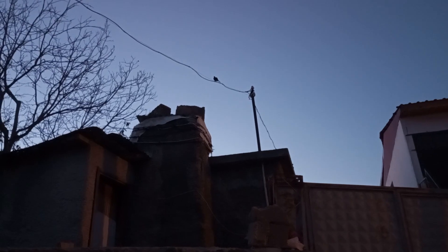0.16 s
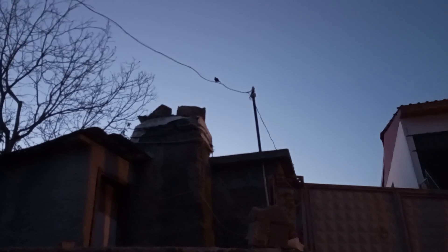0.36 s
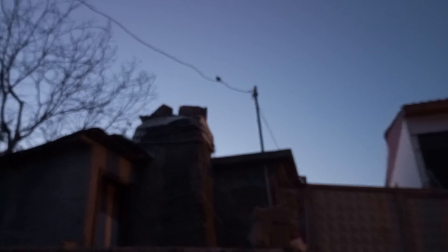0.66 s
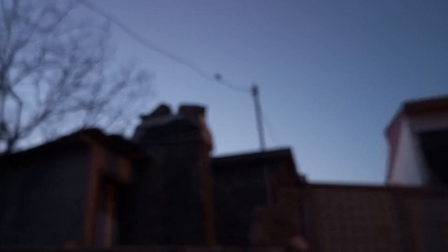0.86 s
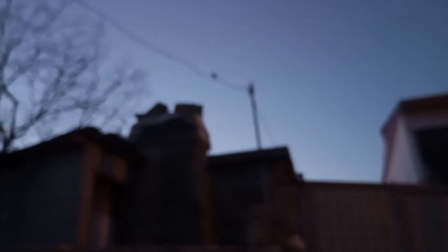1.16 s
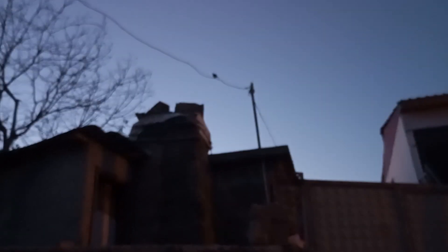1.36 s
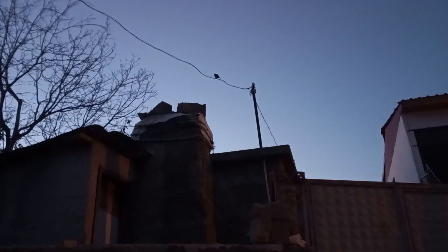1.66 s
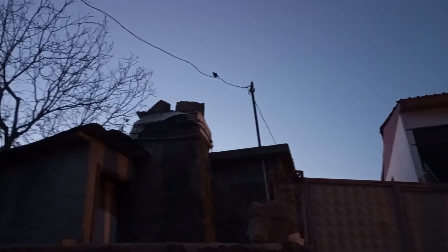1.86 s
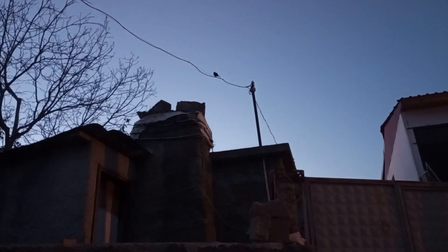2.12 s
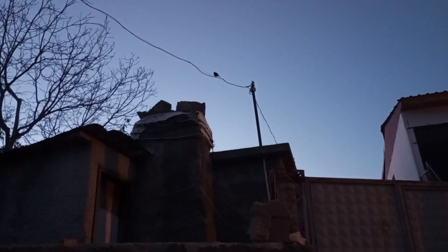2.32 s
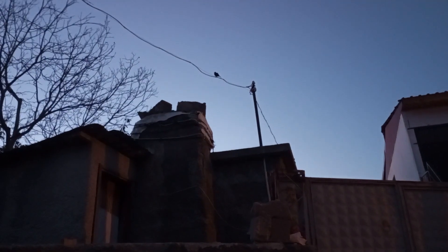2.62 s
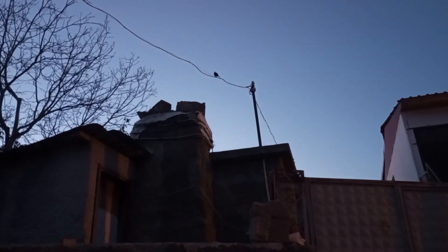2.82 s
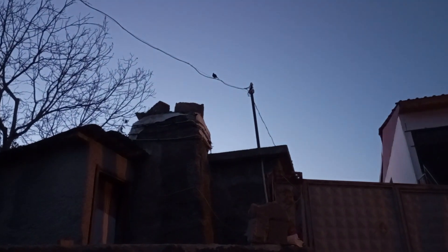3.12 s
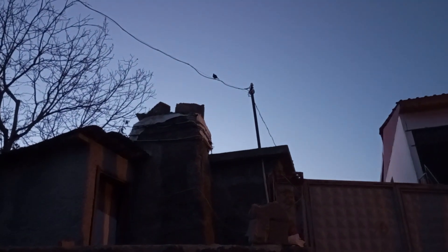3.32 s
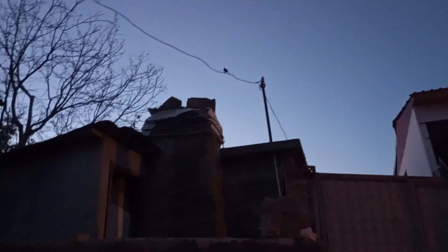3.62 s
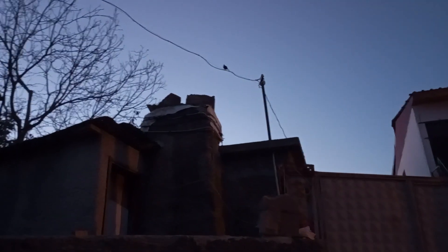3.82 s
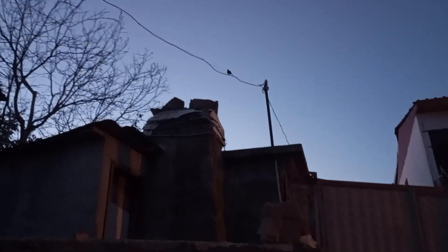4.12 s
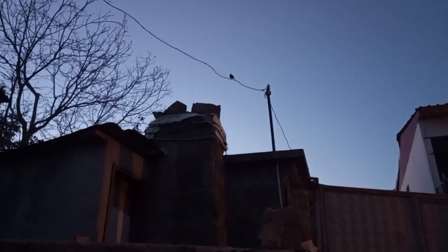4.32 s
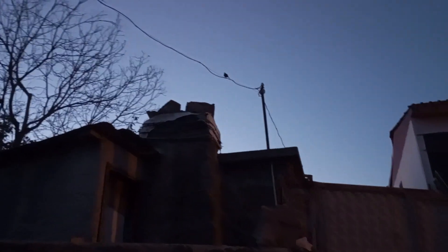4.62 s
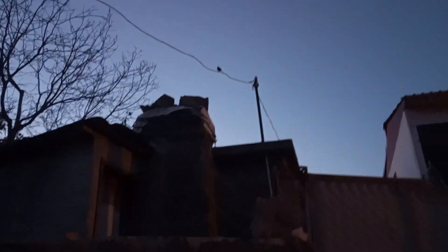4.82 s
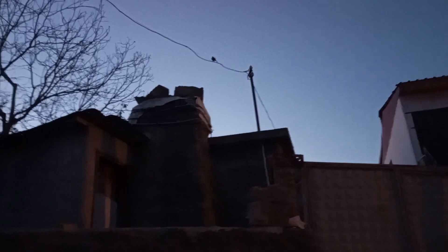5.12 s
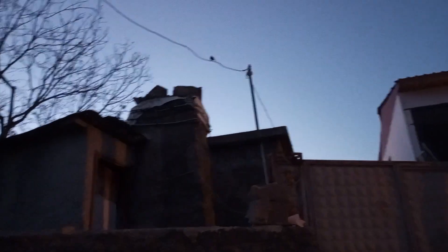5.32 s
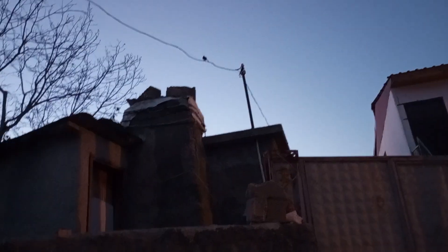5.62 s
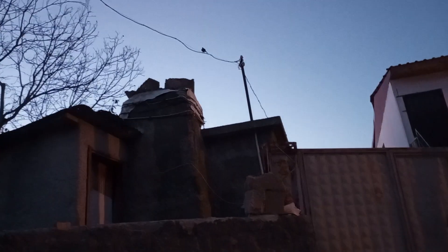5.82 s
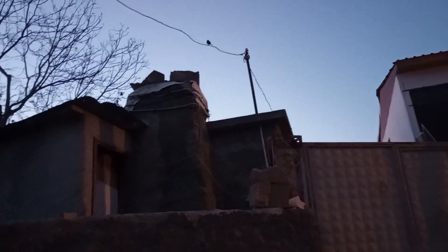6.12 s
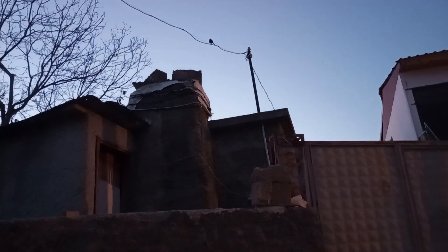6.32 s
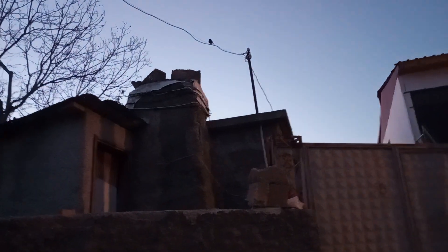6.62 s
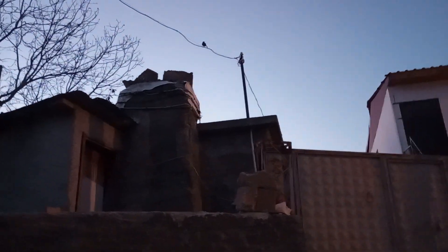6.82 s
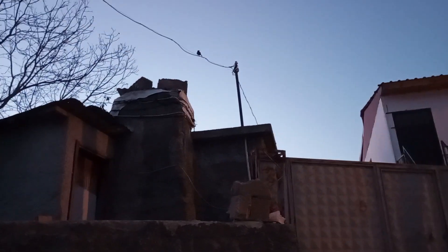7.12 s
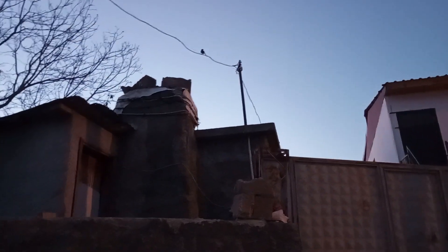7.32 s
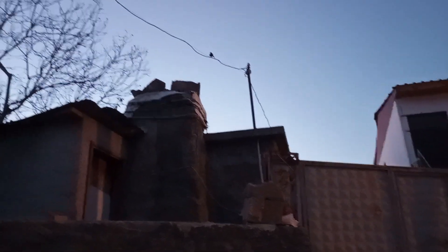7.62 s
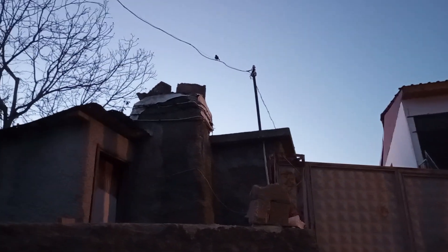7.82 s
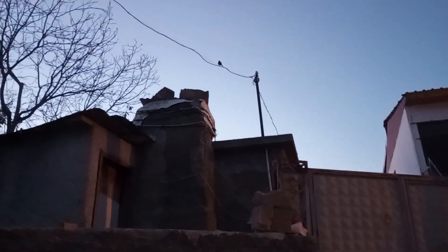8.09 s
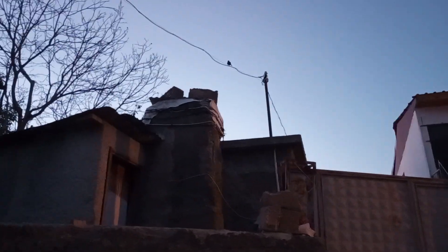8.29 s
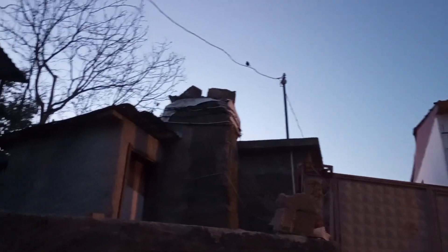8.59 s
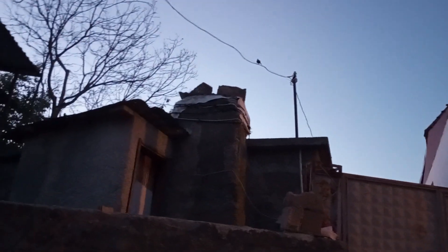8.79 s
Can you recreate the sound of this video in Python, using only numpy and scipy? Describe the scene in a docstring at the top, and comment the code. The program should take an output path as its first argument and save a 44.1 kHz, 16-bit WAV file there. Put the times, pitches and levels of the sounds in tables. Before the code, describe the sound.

Distant roosters crow, then a nearby blackbird whistles, squeaks and trills over a faint town hum and soft wind.

```python
"""Among the roofs of a town, a blackbird on a wire sings fluted whistles, buzzes, squeaks and a trill.
Its voice box, the syrinx, makes a nearly pure tone that slides and swings in pitch.
Two distant roosters crow, their throats shaping a rough voice, and the house walls echo.
Light wind rumbles on the microphone over the hum of the town, and a hand-held camera ticks faintly."""
import sys
import numpy as np
from scipy import signal
from scipy.fft import rfft, irfft, next_fast_len
from scipy.io import wavfile
from scipy.ndimage import uniform_filter1d, map_coordinates

SR = 44100
rng = np.random.default_rng(int(sys.argv[2]) if len(sys.argv) > 2 else 0)


def to_wav(s):
    """Save 16-bit WAV."""
    ch = np.atleast_2d(s).T  # columns
    pcm = np.round(np.clip(ch, -1, 1) * 32767)  # PCM
    wavfile.write(sys.argv[1], SR, pcm.astype(np.int16))


N = 394739
TIME = np.arange(N) / SR


def amp(db):
    """Turn decibels into a gain to multiply by."""
    return 10 ** (np.asarray(db) / 20)


def unit(x):
    """Scale a sound to an average strength (rms) of 1."""
    return x / np.sqrt(np.mean(x ** 2) + 1e-20)


def along(points, hz):
    """Read between (frequency_hz, value) points on a log frequency scale."""
    freqs, values = np.transpose(points)
    return np.interp(np.log(np.abs(hz) + 1), np.log(freqs + 1), values)


def curves(rows):
    """The samples that timed rows cover, then each column as a curve over them."""
    times, *columns = np.transpose(rows)
    span = np.flatnonzero((TIME >= times[0]) & (TIME <= times[-1]))
    return [span] + [np.interp(TIME[span], times, column) for column in columns]


def stretch(start, length):
    """The samples of an event and its progress from 0 to 1."""
    span = np.flatnonzero((TIME >= start) & (TIME < start + length))
    return span, (TIME[span] - start) / length


def ease(ramp):
    """A smooth rise from 0 to 1."""
    return np.sin(np.pi / 2 * np.clip(ramp, 0, 1)) ** 2


def envelope(progress, length, attack, release):
    """Fade in, hold and fade out; times are in seconds."""
    return ease(np.minimum(progress * length / attack, (1 - progress) * length / release))


def fade(size, edge_s=0.0042):
    """Soften both ends of a sound."""
    t = np.arange(size) / SR
    return ease(np.minimum(t, t[::-1]) / edge_s)


def wobble(rate, size=N):
    """A smooth curve through `rate` random values a second."""
    knots = rng.standard_normal(int(size * rate / SR) + 4)
    return map_coordinates(knots, [np.arange(size) * rate / SR])


def filtered(x, response):
    """Scale each frequency of a sound by response(hz)."""
    size = next_fast_len(N + SR // 2)
    return irfft(rfft(x, size) * response(np.fft.rfftfreq(size, 1 / SR)), size)[:N]


def noise(spectrum):
    """Noise of strength 1 with the given tone colour."""
    return unit(filtered(rng.standard_normal(N), lambda hz: amp(along(spectrum, hz))))


def phase_of(hz):
    """How far a wave of changing pitch has turned, in radians."""
    return 2 * np.pi * np.cumsum(hz) / SR


# How the town's far rush grows: time_s, level_db
RUSH_LEVELS = [(0.0, -61.5), (0.6, -60), (1.35, -58.5), (5.76, -58.5), (8.15, -55.5), (8.95, -49.5)]
# Tone colours of the rush, the still air and the hiss: frequency_hz, gain_db
RUSH_COLOUR = [(210, -23), (350, -8.5), (382, -14), (420, -9), (630, 1.5), (680, 1.5), (1320, -2),
               (1470, -3), (1590, -2.5), (3500, -39.5), (4550, -59.5), (7700, -120)]
AIR_COLOUR = [(24, -22), (40, -12.5), (70, -8), (186, -1.5), (244, 2), (292, -2.5), (733, -8), (847, -3.5),
              (961, -3), (1330, -4), (3000, -18.5), (3900, -52), (6600, -120)]
HISS_COLOUR = [(1760, -45), (3000, 3), (3900, -1), (4530, -0.5), (5850, 2.5), (7750, -9.5), (9590, -2),
               (10300, -2.5), (11900, -12.5), (15500, -18.5)]

def town():
    """A far rush slowly swells, over still air and a thin hiss."""
    swell = amp(np.interp(TIME, *np.transpose(RUSH_LEVELS)))
    rush = amp(2.5 + 0.56 * wobble(2.57)) * swell * noise(RUSH_COLOUR)
    return rush + amp(-57.5) * noise(AIR_COLOUR) + amp(-71.5) * noise(HISS_COLOUR)


# Clicks of the camera body: start_s, level_db
CAMERA_TICKS = [(1.2953, -54), (1.7055, -56), (2.0173, -53), (2.57, -64.5), (4.3497, -54), (5.6595, -60)]

def camera_ticks(decay_s=0.012):
    """The camera body gives tiny dry clicks: bright noise that dies at once."""
    strength = sum(amp(db - 60 * np.abs(TIME - s) / decay_s) * (TIME >= s) for s, db in CAMERA_TICKS)
    return amp(-3.5) * strength * noise([(1000, -17), (5000, -4), (10000, 0.5), (15000, -4.5)])


# Tone colour of the wind's rumble: frequency_hz, gain_db
RUMBLE_COLOUR = [(13, -63), (22, -26.5), (64, 4.5), (114, 3.5), (166, -5.5), (276, -21.5), (420, -40),
                 (550, -64.5), (920, -120)]
# Gusts on the microphone: start_s, length_s, level_db
WIND_GUSTS = [(0.0, 0.95, -43.5), (0.994, 0.2, -45), (1.107, 1.8, -56), (2.06, 0.41, -51.5),
              (6.576, 2.5, -44.5), (6.91, 1.73, -37.5)]
# The strongest swirls of air: start_s, level_db
WIND_THUMPS = [(0.105, -26.5), (0.27, -38), (0.399, -34.5), (0.727, -31.5), (0.78, -35), (1.051, -44),
               (7.973, -23.5), (8.118, -24), (8.145, -22.5), (8.432, -26.5), (8.516, -26.5)]

def wind(calm_db=-61.5, lump_db=4.0, thump_hz=100, low_cut_hz=42):
    """Swirling air rumbles on the microphone in gusts; the strongest swirls land as soft thumps."""
    gusts = [amp(db) * envelope((TIME - start) / length, length, attack=0.066, release=0.16)
             for start, length, db in WIND_GUSTS]
    strength = np.maximum(amp(calm_db), np.max(gusts, axis=0))
    out = amp(-2) * strength * unit(noise(RUMBLE_COLOUR) * amp(lump_db * wobble(24)))
    t = np.arange(SR // 10) / SR
    age = t / 0.0041
    pulse = age * np.exp(1 - age)
    for start, db in WIND_THUMPS:
        hz = thump_hz * np.exp(0.23 * rng.standard_normal())
        out[round(start * SR):][:len(t)] += amp(db - 1.5) * pulse * np.sin(2 * np.pi * hz * t)
    # the small microphone loses the deepest bass
    return filtered(out, lambda hz: hz ** 2 / np.hypot(hz ** 2, low_cut_hz ** 2))


# Time for the street's sound to fade by 60 dB: frequency_hz, decay_s
STREET_DECAY = [(300, 0.31), (2000, 0.56), (5000, 0.45), (12000, 0.043)]

def street_reverb(x, build_s):
    """Sound scatters between the houses; the treble dies first."""
    hz, t, spectrum = signal.stft(rng.standard_normal(SR), SR, nperseg=256)
    decay = amp(-60 * t / along(STREET_DECAY, hz)[:, None])
    tail = signal.istft(spectrum * decay * (1 - np.exp(-t / build_s)), SR, nperseg=256)[1]
    return signal.fftconvolve(x, tail / np.linalg.norm(tail))[:N]


# One echo for each wall: delay_s, gain_db
WALL_ECHOES = [(.0088, -9), (0.02, -9.5), (0.093, -17), (.118, -23)]

def wall_echoes(x):
    """Sound bounces back once from each nearby house wall."""
    return sum(amp(db) * np.interp(TIME - delay, TIME, x, left=0) for delay, db in WALL_ECHOES)


# How a rooster's throat colours its voice: frequency_hz, gain_db
ROOSTER_THROAT = [(750, -11.5), (852, -10.5), (875, -0.5), (1100, -3.5), (1450, 8.5), (1800, 0),
                  (2250, -22.5), (2550, -31.5), (2750, -14), (2920, -34), (4300, -68), (5300, -33),
                  (6600, -31), (8000, -52.5)]
# Syllables of two overlapping crows (roughness runs from 0 to 1):
# start_s, length_s, from_hz, to_hz, level_db, from_roughness, to_roughness
CROW_SYLLABLES = [ (.787, .195, 746, 757.3, -45, 0.24, 0.15), (.97, 0.33, 750, 809, -52.5, .25, 0.62),
                  (1.068, 0.24, 883.3, 865, -44, 0.21, 0.52), (1.265, 0.47, 819.5, 823, -46, 0.63, 0.71),
                  (1.308, 0.35, 907.6, 870.6, -42, 0.46, 0.7),
                  (1.682, 0.35, 768.6, 786.5, -47.5, 0.2, 0.31), (1.95, 0.361, 846.7, 849, -41, 0.04, 0.06),
                  (2.25, 0.26, 856.4, 860.6, -44, 0.18, 0.92), (2.479, 0.18, 745, 746.6, -47.5, 0.25, 0.05),
                  (2.629, 0.21, 748.4, 725, -52.5, 0, 0.17)]

def roosters(jitter=0.049, flutter_db=4, drift_db=1.7, scoop_share=0.0352, scoop_s=0.0217):
    """The throat shapes a tone rich in overtones; in the harsh parts pitch and loudness shake."""
    out = np.zeros(N)
    attack_s, release_s = 0.046, 0.062
    # for a moment the voice cracks into thirds of its pitch
    crack_start_s, crack_length_s = 2.14, 0.28
    crack_progress = (TIME - crack_start_s) / crack_length_s
    crack = amp(-51) * envelope(crack_progress, crack_length_s, attack_s, release_s)
    for start, length, from_hz, to_hz, db, from_rough, to_rough in CROW_SYLLABLES:
        span, progress = stretch(start, length)
        # each syllable scoops up to its pitch and sags at the end
        scoop = scoop_share * np.exp(-np.minimum(progress, 1 - progress) * length / scoop_s)
        hz = (from_hz + (to_hz - from_hz) * progress) * (1 - scoop)
        rough = from_rough + (to_rough - from_rough) * progress
        phase = phase_of(hz * (1 + jitter * rough * wobble(260, len(span))))
        voice = sum(amp(along(ROOSTER_THROAT, k * hz)) * np.sin(k * phase) for k in range(1, 12))
        flutter = drift_db * wobble(30.5, len(span)) + flutter_db * rough * wobble(89.5, len(span))
        thirds = np.sin(2 * phase / 3) + amp(-8) * sum(np.sin(k * phase / 3) for k in (4, 5))
        syllable = amp(db + flutter) * voice + crack[span] * thirds
        out[span] += envelope(progress, length, attack_s, release_s) * syllable
    return np.sqrt(2) * out


# Tone colour of the thin, high rasp on the blackbird's low notes: frequency_hz, gain_db
RASP_COLOUR = [(3500, -16), (6200, -13.5), (7800, -23), (9500, 14.5), (11000, -10.5), (13800, -13.5),
               (15700, -31)]

def rasp(song, gain_db=-43, raspy_below_hz=2050):
    """A soft, high hiss rides on the song and follows its strength, most on the low notes."""
    low_notes = filtered(song, lambda hz: 1 / np.sqrt(1 + (hz / raspy_below_hz) ** 20))
    strength = np.sqrt(np.abs(uniform_filter1d(low_notes ** 2, size=300)))
    return amp(gain_db) * strength * noise(RASP_COLOUR)


# The blackbird's overtones next to its main tone: frequency_hz, gain_db
SYRINX_OVERTONES = [(3400, -35.5), (5000, -47.5), (6300, -40), (8200, -61), (9700, -46), (11800, -64),
                    (14200, -50.5), (15700, -57)]

def syrinx(hz, db, press_db, sparkle_db=0, waver=0.0036, blur=0.006):
    """The voice box sings a nearly pure tone; press lifts its low overtones most, sparkle its highest."""
    hz = uniform_filter1d(hz, size=40) * (1 + waver * wobble(220, len(hz)))
    shaky_phase = phase_of(hz * (1 + blur * wobble(1500, len(hz))))
    overtones = np.zeros(len(hz))
    for k in range(2, 9):
        lift_db = press_db * 2 / k + sparkle_db * along([(10500, 0), (13000, 1)], k * hz)
        gain = amp(along(SYRINX_OVERTONES, k * hz) + lift_db) * (k * hz < SR / 2)
        overtones += gain * np.sin(k * shaky_phase)
    return np.sqrt(2) * amp(db) * fade(len(hz)) * (np.sin(phase_of(hz)) + overtones)


def warble(hz, db, rate, swing_hz, press_db, sparkle_db=0, throb_db=3, scatter=0.25):
    """The pitch swings fast and a little unevenly; the tone is loudest at the bottom of each swing."""
    cycle = np.sin(phase_of(np.full(len(hz), rate))) + scatter * wobble(406.7, len(hz))
    throb = throb_db * cycle * swing_hz / np.max(swing_hz)
    return syrinx(hz + swing_hz * cycle, db - throb, press_db, sparkle_db, waver=0.00067)


# The blackbird's squeaks, and a thin, high ring above the trill:
# start_s, length_s, from_hz, to_hz, level_db
SQUEAKS_AND_RING = [ (3.552, .032, 2170, 2740, -50), (3.575, .027, 1755, 2330, -36.5),
                    (3.606, 0.016, 3170, 3520, -48.5), (3.608, 0.016, 2023, 1780, -38.5),
                    (3.625, 0.016, 1874, 3040, -36.5), (3.634, .092, 2945, 2900, -48.5),
                    (3.646, 0.015, 2944, 1860, -40), (3.887, .075, 2825, 3020, -43),
                    (3.891, 0.073, 4600, 4790, -63.5), (4.119, .038, 2824, 2746, -45),
                    (4.143, .028, 1677, 2076, -39), (4.16, 0.0274, 3970, 3710, -58.5),
                    (4.162, .019, 1970, 2700, -37), (4.183, 0.031, 1853, 1743, -39.5),
                    (4.19, 0.022, 3490, 3250, -48), (4.424, .21, 8080, 7830, -70.5),
                    (4.673, 0.0285, 3120, 2850, -51), (7.37, .024, 1840, 1570, -43),
                    (8.132, 0.072, 2183, 2028, -35.5)]

def squeaks():
    """Short, straight slides in pitch; the two sides of the syrinx sometimes sound together."""
    out = np.zeros(N)
    for start, length, from_hz, to_hz, db in SQUEAKS_AND_RING:
        span, progress = stretch(start, length)
        tone = syrinx(from_hz + (to_hz - from_hz) * progress, db, press_db=5)
        out[span] += envelope(progress, length, attack=0.0047, release=0.0055) * tone
    return out


# The blackbird's buzzes, and the wavering overtones of a squeak and the last whistle:
# start_s, length_s, from_hz, to_hz, level_db, swings_per_s, swing_hz
BUZZES_AND_OVERTONES = [(3.712, 0.16, 2540, 3100, -43, 136.7, 396),
                        (4.006, 0.14, 2485, 2760, -41.5, 130, 430), (4.667, .05, 6440, 5650, -56, 230, 260),
                        (8.799, 0.14, 3246, 3200, -55.5, 350, 258)]

def buzzes():
    """Sliding tones whose pitch swings so wide and fast that they buzz."""
    out = np.zeros(N)
    for start, length, from_hz, to_hz, db, rate, swing_hz in BUZZES_AND_OVERTONES:
        span, progress = stretch(start, length)
        hz = from_hz + (to_hz - from_hz) * progress
        tone = warble(hz, db, rate, swing_hz, press_db=15, scatter=0.32)
        out[span] += envelope(progress, length, attack=0.027, release=0.019) * tone
    return out


# How the wide-open beak colours the trill: frequency_hz, gain_db
OPEN_BEAK = [(2900, -3), (3400, 0.5), (4400, -9.5), (5050, -6), (5500, -8), (6300, -9.5), (7500, -33),
             (7950, -15), (8400, -29), (9700, -16.5), (11500, -34)]
# The trill that closes the first phrase: time_s, sweeps_per_s, level_db
TRILL_SWEEPS = [(4.381, 71, -53), (4.45, 55, -45), (4.53, 61, -44.5), (4.61, 55, -44), (4.625, 36, -46)]

def trill(top_hz=4900, bottom_hz=2900, bend=1.2, overtone_db=-4):
    """Steep downward sweeps through the open beak, silent while the pitch jumps back up."""
    out = np.zeros(N)
    span, rate, db = curves(TRILL_SWEEPS)
    fall = np.cumsum(rate) / SR % 1  # runs from 0 to 1 in each sweep
    waver = 1 + 0.018 * wobble(500, len(span))
    hz = (top_hz + (bottom_hz - top_hz) * fall ** bend) * waver
    gate = ease(np.minimum(fall, 1 - fall) / 0.14)
    tone = sum(amp(along(OPEN_BEAK, k * hz) + overtone_db * (k > 1)) * np.sin(k * phase_of(hz))
               for k in range(1, 4))
    out[span] = np.sqrt(2) * amp(db) * gate * tone
    return out


# The blackbird's fluted whistles: start_s, length_s, level_db, swell_db, press_db, sparkle_db,
# swings_per_s, widest_swing_hz, widest_after_s, swing_opens_s, swing_closes_s
WHISTLE_NOTES = [ (2.652, 0.31, -39.5, 14, -3, -1.5, 47.4, 180, 0.15, 0.17, 0.051),
                 (3.04, 0.21, -27.5, 1, -14, -5, 63, 122, .17, 0.075, 0.061),
                 (7.033, 0.16, -38, 0, 3, 8.5, 43, 10, 0.033, .05, 0.046),
                 (7.256, .332, -34.5, 5.5, 5.5, 2.5, 44, 820, .11, .018, 0.046),
                 (7.781, 0.45, -30.5, -3.5, -4.5, -5, 47.8, 645, .382, 0.022, .028),
                 (8.76, 0.28, -40.5, 4.5, 10, -2, 65, 15, 0.14, 0.035, .05)]
# The tune, one list of points for each whistle: time_s, pitch_hz
WHISTLE_TUNES = [
    [(2.65, 2850), (2.735, 2252), (2.79, 2026), (2.83, 2169), (2.953, 2482)],
    [(3.05, 2142), (3.088, 1620), (3.15, 1838), (3.25, 1954)],
    [(7.04, 2250), (7.076, 2034), (7.12, 1697), (7.2, 1512)],
    [(7.26, 2114), (7.335, 2136), (7.365, 2540), (7.45, 2635), (7.49, 2500), (7.54, 2494)],
    [(7.79, 2190), (7.865, 2105), (7.897, 1826), (7.945, 1674), (8.012, 1815), (8.14, 2284), (8.168, 2730),
     (8.24, 2610)],
    [(8.775, 1842), (8.84, 1688), (8.89, 1778), (8.93, 1706)],
]

def whistles(flutter_db=3.0, quiver_below_hz=2100, sparkle_db_per_hz=0.0183):
    """Sliding, flute-like notes; a warble widens and narrows again, and low pitches quiver."""
    out = np.zeros(N)
    for note, tune in zip(WHISTLE_NOTES, WHISTLE_TUNES):
        start, length, db, swell_db, press_db, sparkle_db, rate, widest_hz, after, opens, closes = note
        span, progress = stretch(start, length)
        hz = np.interp(TIME[span], *np.transpose(tune))
        since_widest = progress * length - after
        quiver_hz = 0.05 * np.maximum(quiver_below_hz - hz, 0)
        swing_hz = widest_hz * np.exp(np.minimum(since_widest / opens, -since_widest / closes)) + quiver_hz
        # a wide swing weakens the tone and brings out its highest overtones
        loss_db = 7 * np.tanh(swing_hz / 148)
        shine_db = sparkle_db + sparkle_db_per_hz * swing_hz
        level_db = db + swell_db * progress ** 1.44 - loss_db + flutter_db * wobble(45.7, len(span))
        tone = warble(hz, level_db, rate, swing_hz, press_db, shine_db)
        out[span] += envelope(progress, length, attack=0.03, release=0.014) * tone
    return out


def scene():
    """The near blackbird is heard mostly directly; the far roosters carry more scattered sound."""
    song = whistles() + squeaks() + buzzes()
    bird = song + rasp(song) + trill()
    crows = roosters()
    near = bird + wall_echoes(bird) + amp(-10.5) * street_reverb(bird, build_s=0.0036)
    far = amp(-3.5) * crows + amp(-8.5) * street_reverb(crows, build_s=0.0084)
    return (near + far + wind() + town() + camera_ticks())[None]


def record(dry, top_hz=15690):
    """Both ends fade briefly, and the camera cuts off the highest treble."""
    return filtered(dry[0] * fade(N), lambda hz: hz < top_hz)[None]


dry = scene()
out = record(dry)
to_wav(out)
```